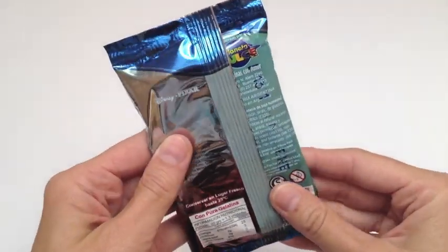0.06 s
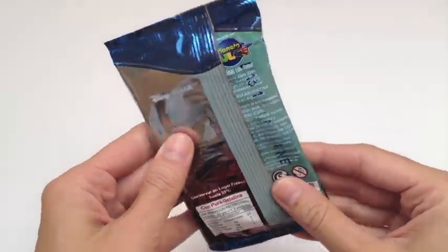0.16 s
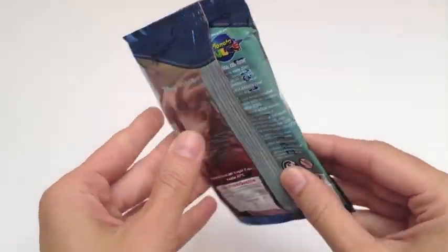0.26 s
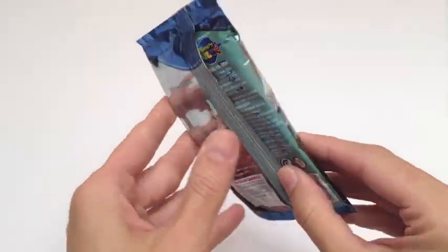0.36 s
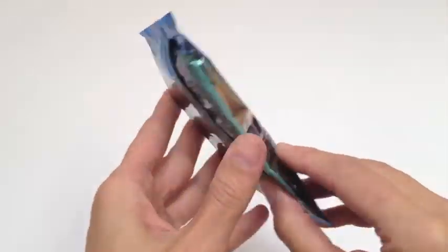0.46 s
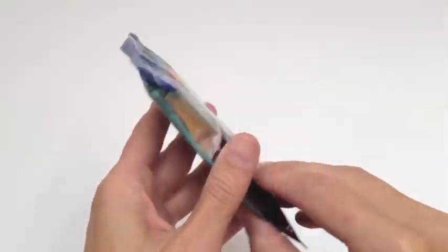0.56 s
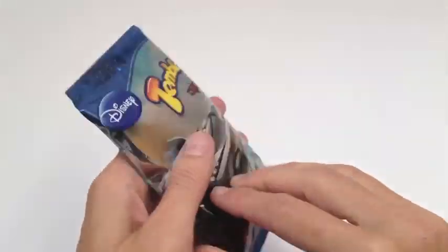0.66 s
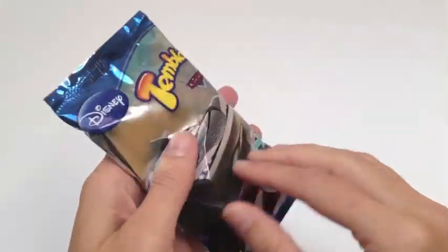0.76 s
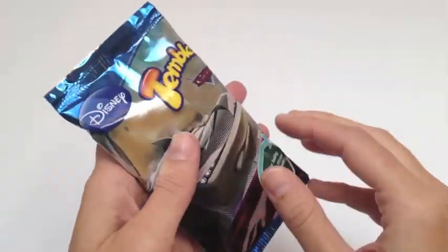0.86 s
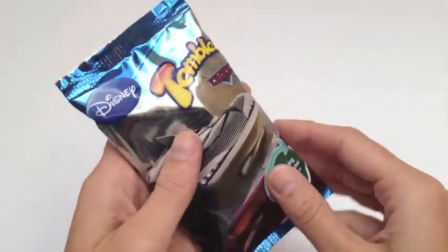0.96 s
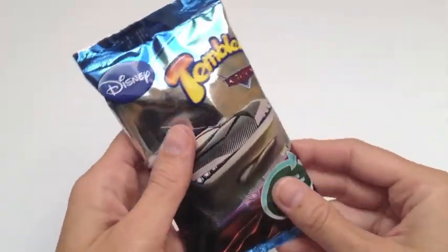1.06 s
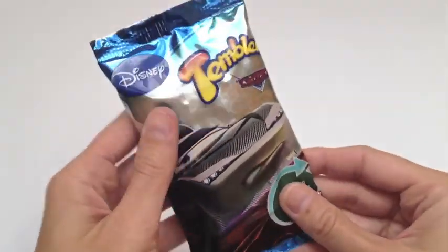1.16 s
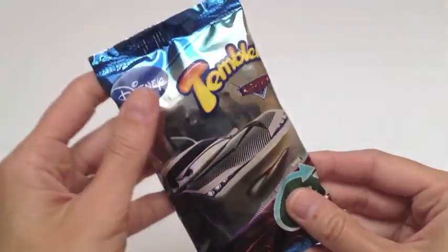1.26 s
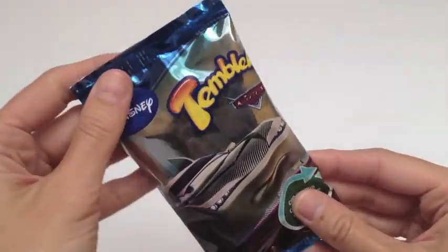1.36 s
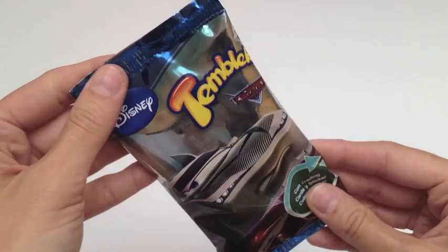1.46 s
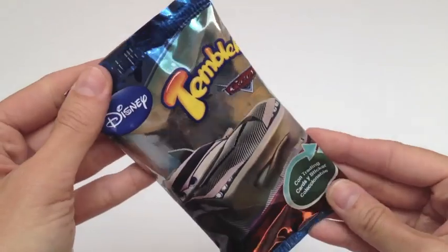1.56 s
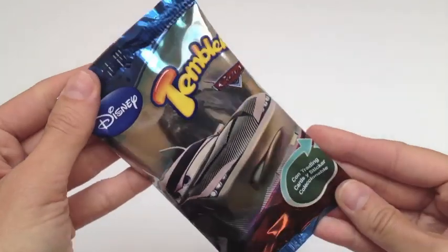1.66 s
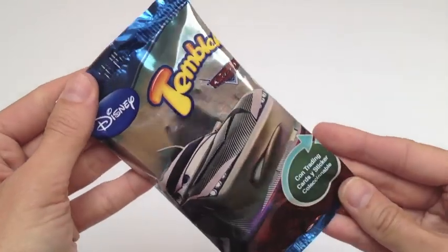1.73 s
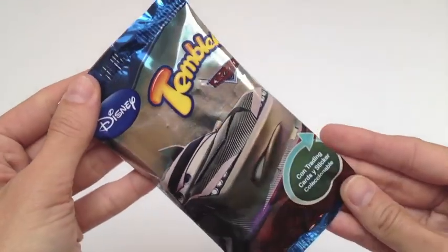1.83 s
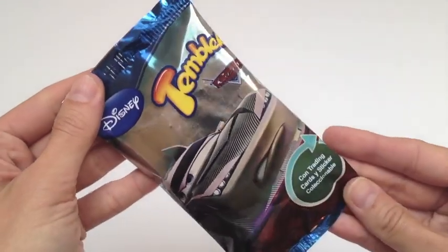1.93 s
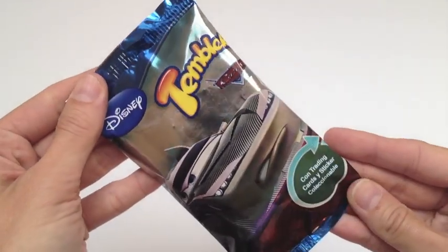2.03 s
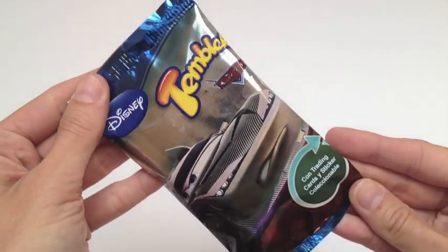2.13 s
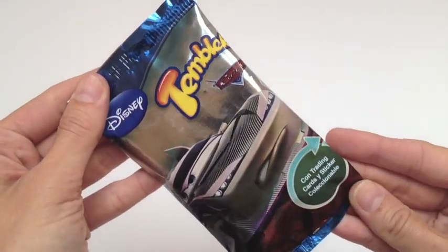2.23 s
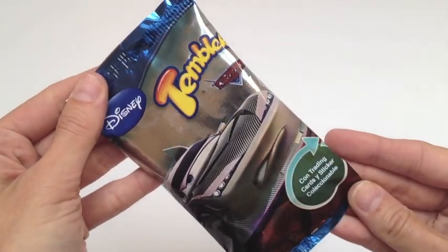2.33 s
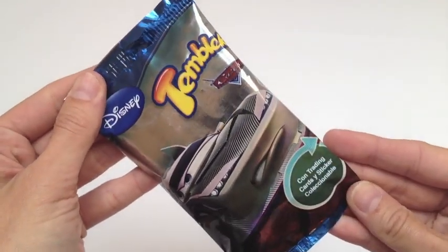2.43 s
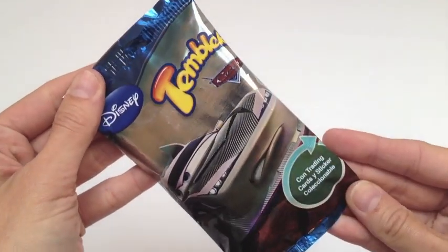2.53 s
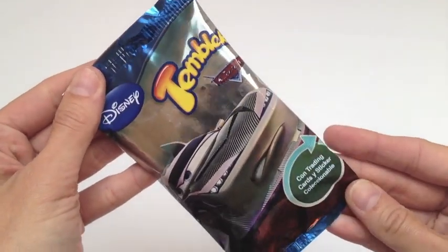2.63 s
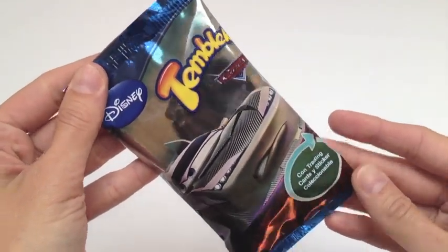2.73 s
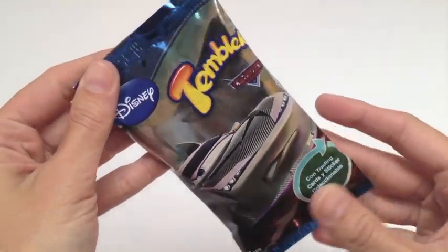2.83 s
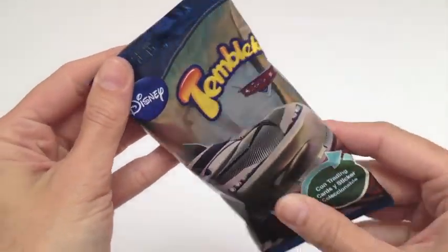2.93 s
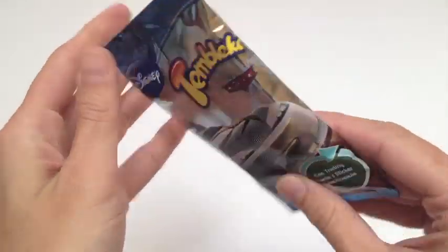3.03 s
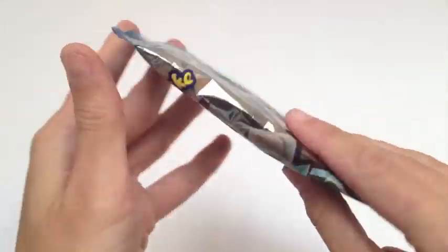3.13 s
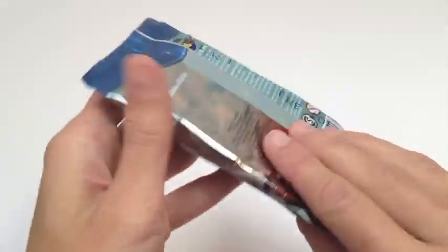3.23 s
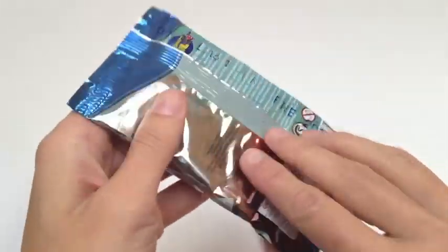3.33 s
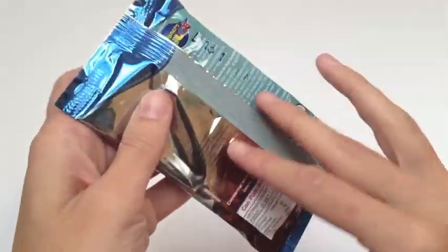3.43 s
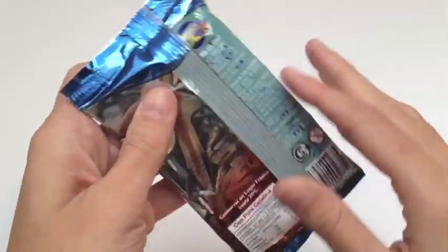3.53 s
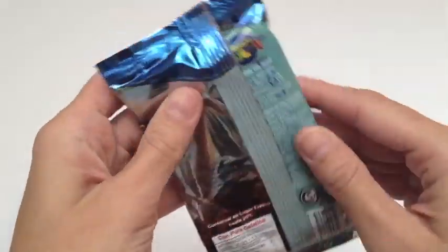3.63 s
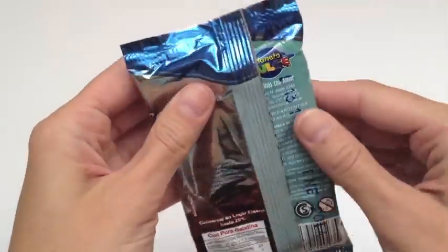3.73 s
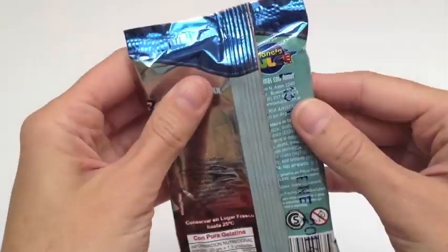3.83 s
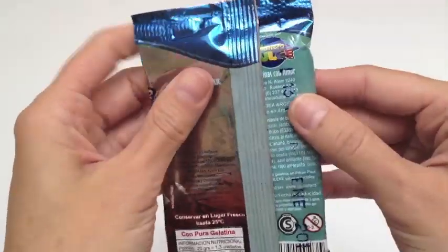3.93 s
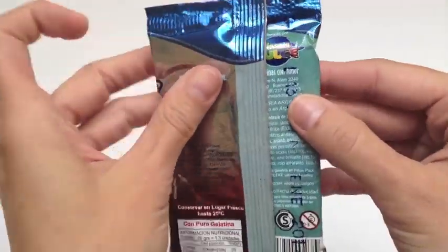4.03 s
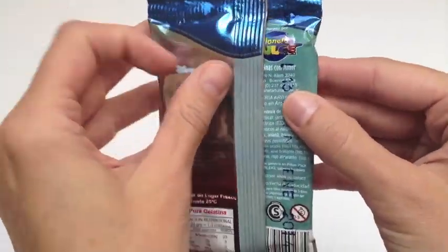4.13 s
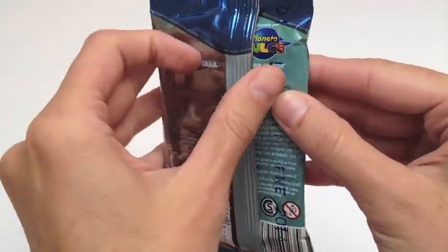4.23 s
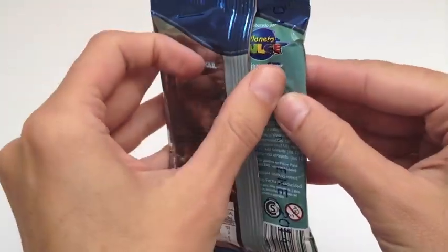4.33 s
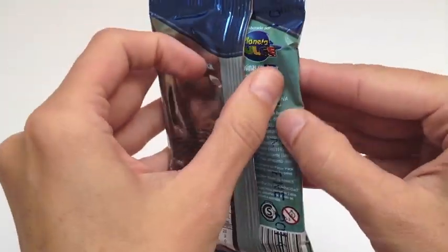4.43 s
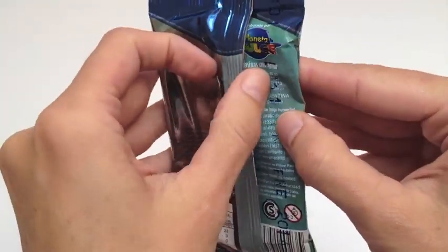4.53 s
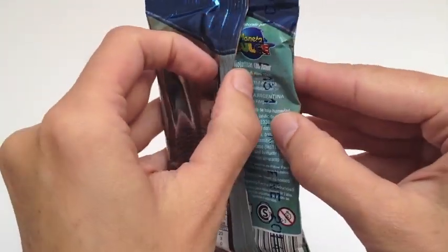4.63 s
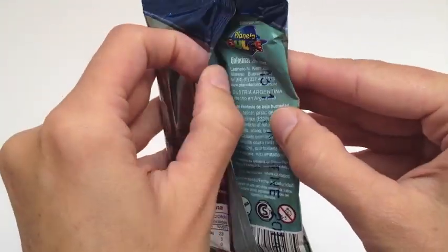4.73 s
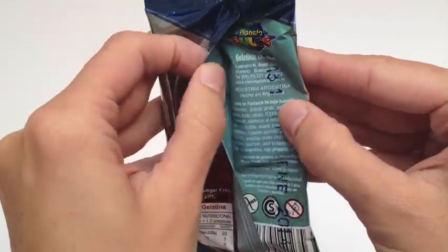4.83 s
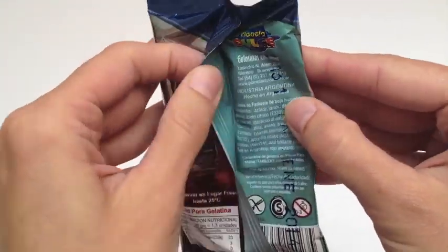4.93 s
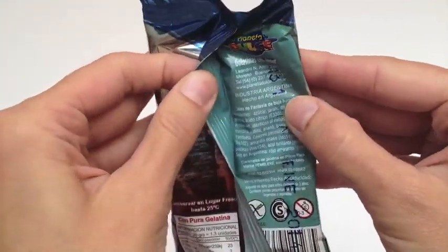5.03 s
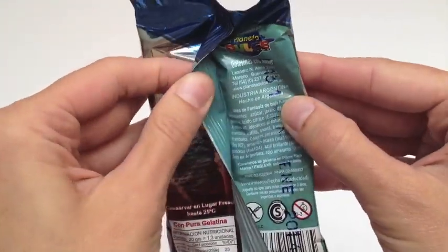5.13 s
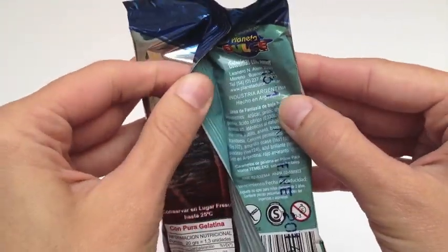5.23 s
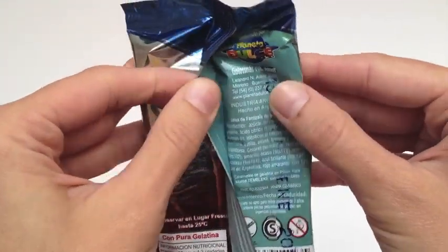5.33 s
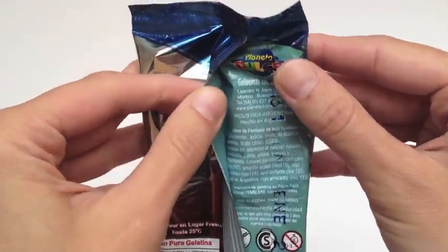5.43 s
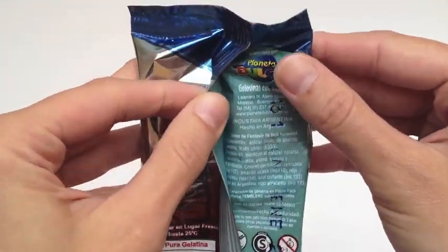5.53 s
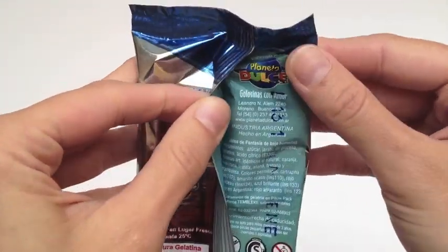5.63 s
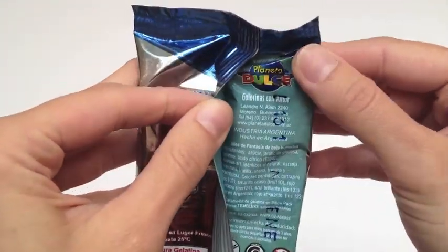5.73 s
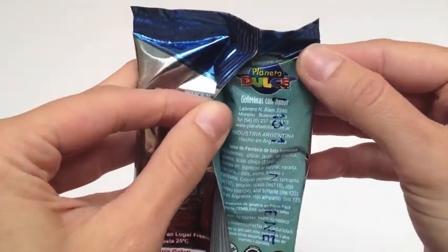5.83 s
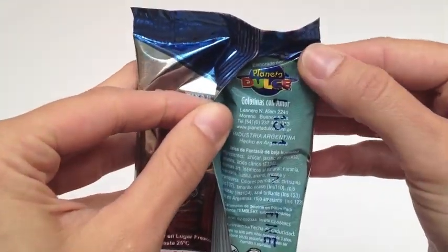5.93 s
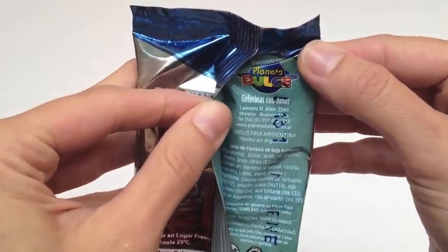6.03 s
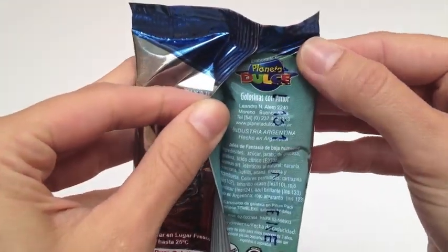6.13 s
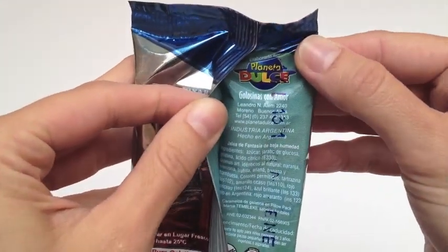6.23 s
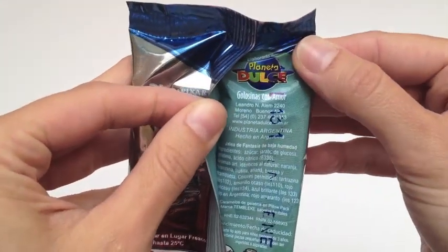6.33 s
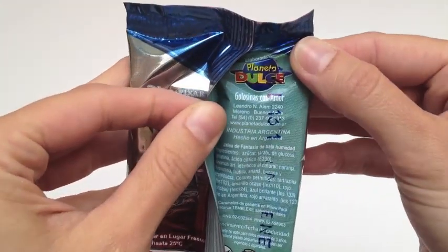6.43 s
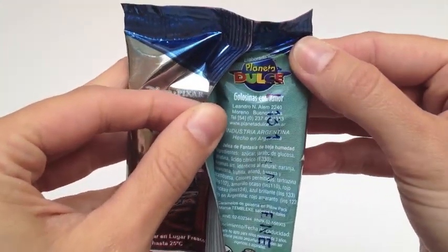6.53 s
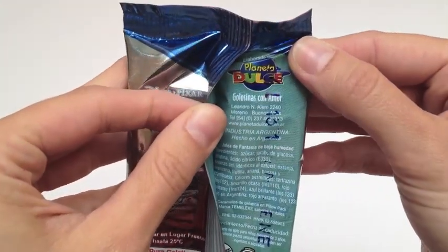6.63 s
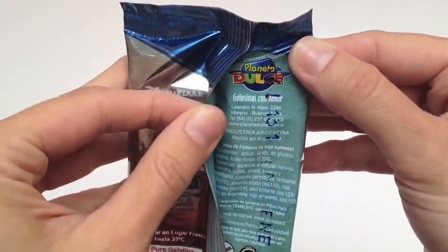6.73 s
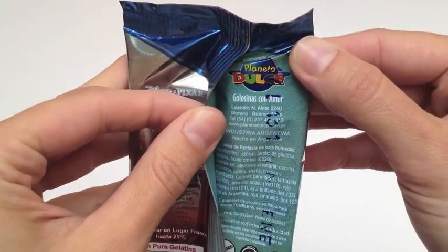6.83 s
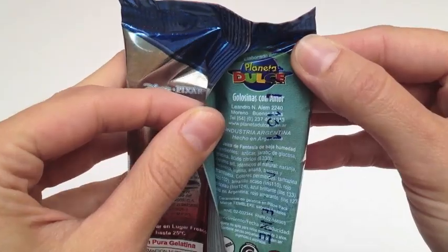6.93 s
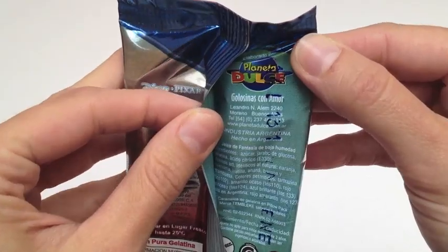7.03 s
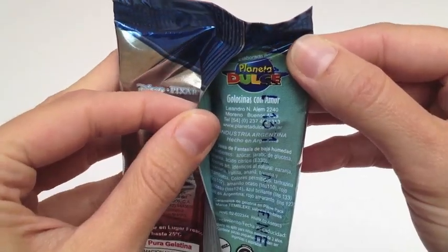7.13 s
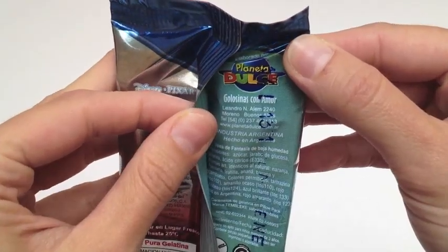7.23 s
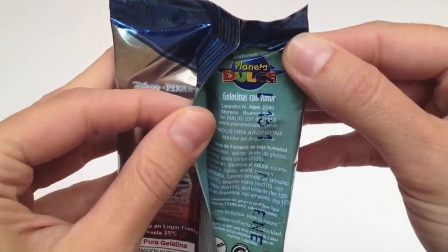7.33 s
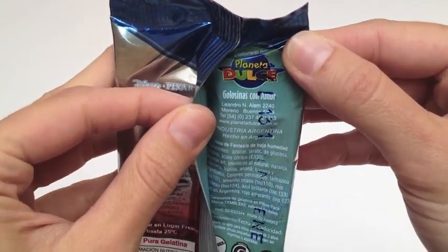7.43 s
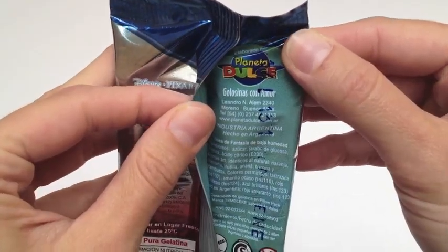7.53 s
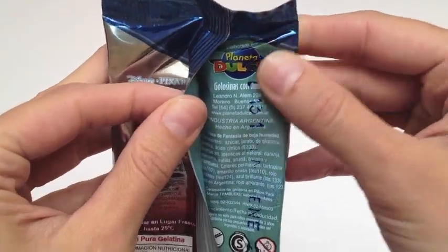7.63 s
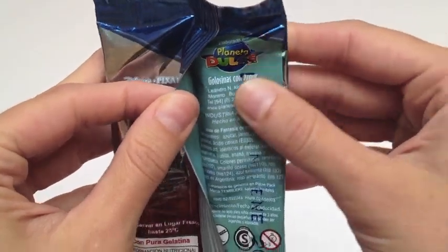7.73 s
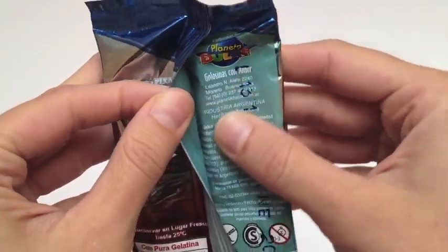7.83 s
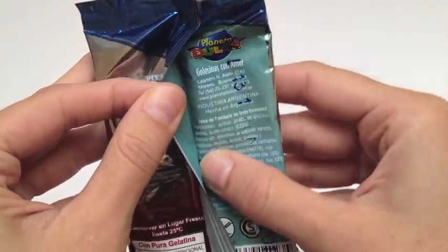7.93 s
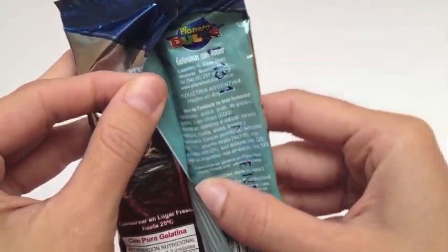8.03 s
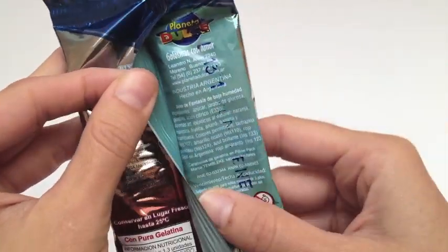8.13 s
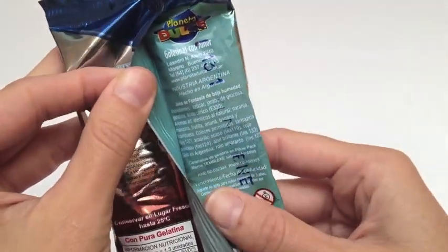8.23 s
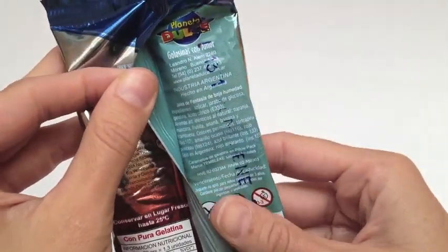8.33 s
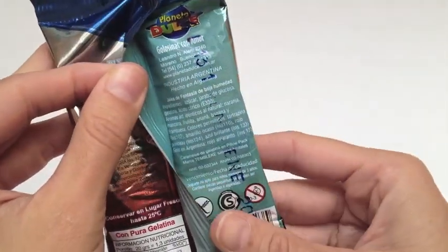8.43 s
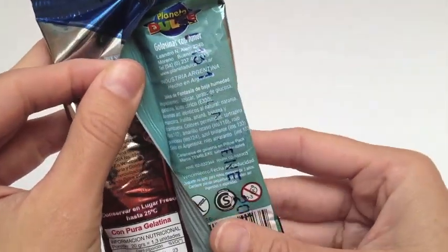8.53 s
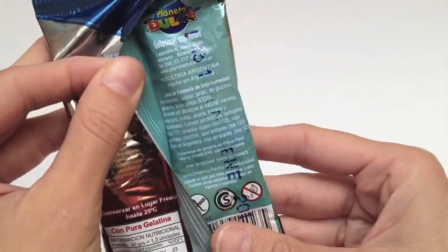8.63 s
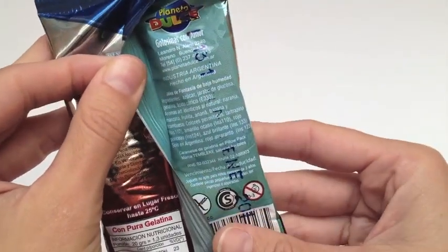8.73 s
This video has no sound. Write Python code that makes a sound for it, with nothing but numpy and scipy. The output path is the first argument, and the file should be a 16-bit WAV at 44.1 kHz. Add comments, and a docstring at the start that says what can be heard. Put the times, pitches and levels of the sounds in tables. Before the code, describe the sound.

Stiff foil snack packet crinkles and snaps close by as hands turn it over, pinch and pull its seam, with quiet pauses between bursts.

```python
"""Stiff metallised film buckles in single snaps and runs of finer crinkles as two hands turn a snack packet
over, pinch its back seam and pull at it, close by in a bare room. Each snap is a sudden flip ringing filters
for the facet, the pouch and the crease. Swarms of tiny rung clicks make the crinkle, uneven noise the sliding
fingers, low pulses the finger bumps. Echoes and a soft noise tail make the room, over air, whine and hum."""
import sys
import numpy as np
from scipy import signal
from scipy.fft import rfft, irfft, next_fast_len
from scipy.io import wavfile

SR = 44100
rng = np.random.default_rng(int(sys.argv[2]) if len(sys.argv) > 2 else 0)


def dump_mix(stems):
    """Bounce the given channels to the path in sys.argv[1] as a 16-bit WAV at rate SR."""
    frames = np.atleast_2d(stems).T  # one column per channel
    limited = np.clip(frames, -1, 1)  # hard clip at full scale
    pcm = np.round(limited * 32767).astype(np.int16)
    wavfile.write(sys.argv[1], SR, pcm)


N = 386757   # length in samples
CUTOFF_HZ = 15700   # top of the sound
SNAP_SAMPLES = 768   # length of one snap
SNAP_LEVEL_S = .005   # time over which a snap's energy is spread to state its level
LEAD_S = .004   # part of a snap that comes before the flip


def from_db(db):
    """Decibels to gain."""
    return np.exp(np.asarray(db) * np.log(10) / 20)


def at_hz(points, hz):
    """Read a (Hz, value) table on a log-frequency axis."""
    f, value = np.transpose(points)
    return np.interp(np.log(np.maximum(hz, 1)), np.log(f), value)


def coloured(x, spectrum):
    """Give noise a spectrum; rms 1."""
    size = next_fast_len(len(x))
    gain = from_db(at_hz(spectrum, np.fft.rfftfreq(size, 1 / SR)))
    y = irfft(rfft(x, size) * gain, size)[:len(x)]
    return y / np.std(y)


def noise(spectrum):
    """Steady noise of a given spectrum; rms 1."""
    return coloured(rng.standard_normal(N), spectrum)


def resonance(x, hz, q):
    """A damped resonance with gain 1 on top."""
    w = 2 * np.pi * min(hz, .45 * SR) / SR
    a = np.sin(w) / (2 * q)
    return signal.lfilter([a, 0, -a], [1 + a, -2 * np.cos(w), 1 - a], x)


def lowpass(x, hz):
    """Two-pole low-pass."""
    w = 2 * np.pi * min(hz, .45 * SR) / SR
    a, c = np.sin(w) / np.sqrt(2), np.cos(w)
    return signal.lfilter(np.array([1, 2, 1]) * (1 - c) / 2, [1 + a, -2 * c, 1 - a], x)


def at_level(x, db):
    """Scale a short sound so that its energy, spread over SNAP_LEVEL_S, has this level."""
    return x * from_db(db) * np.sqrt(SNAP_LEVEL_S * SR / np.sum(x ** 2))


def add(track, s, sound):
    """Mix a short sound into a track at time s."""
    i = int(np.clip(round(s * SR), 0, N - 1))
    track[i:i + len(sound)] += sound[:N - i]


def jolt(flutter, decay_s, creep, creep_s):
    """A facet creeps towards its limit, flips at once, then flutters for a moment."""
    t = (np.arange(SNAP_SAMPLES) - round(LEAD_S * SR)) / SR
    before = creep * np.exp(-np.abs(t) / creep_s)
    after = flutter * np.exp(-np.abs(t) / decay_s)
    shiver = np.where(t < 0, before, after)
    return (t == 0) + shiver * rng.standard_normal(SNAP_SAMPLES)


def snap(hz, facet_db, thump_db, crack_db, ragged):
    """One buckle: the facet rings, the whole pouch thumps, the crease itself cracks."""
    own = np.exp(ragged * rng.standard_normal(4).clip(-1.5, 1.5))   # no two facets are alike
    # a slack buckle (0) is a round pop, a taut one (1) a wide, bright click
    taut = np.clip((crack_db - facet_db + 22.5) / 21, 0, 1)

    flip = jolt(flutter=0.11 * ragged, decay_s=0.0027, creep=0.1 * ragged, creep_s=0.00076)
    body = resonance(flip, hz, q=1.15 - 0.88 * taut)
    ring = resonance(flip, hz * own[3] ** 0.12, q=24.0)   # it rings on briefly near its own pitch
    panel = resonance(flip, 930 * own[0] ** 0.25, q=3.1)   # the wider panel around it
    seam = resonance(flip, 3700 * own[1] ** 0.021, q=4.0)   # the stiff seam
    facet = body + 0.27 * ring + 1.09 * panel + 0.45 * seam
    facet = lowpass(resonance(facet, 0.76 * hz, q=0.66), hz * (1.84 + 0.87 * taut))

    # a heavier thump moves more of the pouch and sounds lower
    pouch_hz = np.clip(470 * 2 ** (-(thump_db + 49) / 45), 395, 600) * own[2] ** 0.049
    thump = resonance(resonance(flip, pouch_hz, q=3.14), 0.59 * pouch_hz, q=0.58)

    split = jolt(flutter=0.46 * ragged, decay_s=0.0013, creep=0.2 * ragged, creep_s=0.00057)
    # the more the crack outweighs the facet, the more of it lies in the top octave
    sharpness = from_db(np.clip(0.18 * (crack_db - facet_db + 5.5), -9, 6))
    crack = resonance(resonance(split, 6910, q=3.8), 3070, q=0.69)
    fizz = resonance(resonance(split, 14520, q=2.3), 12440, q=2.5)
    crack = crack + 0.79 * sharpness * fizz

    sound = at_level(facet, facet_db - .2) + at_level(thump, thump_db - 1.5) + at_level(crack, crack_db - .2)
    return rng.choice([-1, 1]) * sound


def creases(snaps, ragged):
    """All snaps in a row; a higher ragged ripples and varies them, 0 leaves them smooth."""
    out = np.zeros(N)
    for s, hz, facet_db, thump_db, crack_db in snaps:
        add(out, s - LEAD_S, snap(hz, facet_db, thump_db, crack_db, ragged))
    return out


# The creases that stand out as single snaps. Each row: time of the flip in seconds, facet pitch in Hz, then
# facet ring, pouch thump and treble crack in dB, before the small trims in snap().
MAIN_SNAPS = [(0.117, 1680, -48, -45.5, -71), (0.1731, 2380, -30.5, -43, -41.5),
              (0.1791, 1820, -39.5, -57, -41.5), (0.197, 2470, -39, -47.5, -51.5),
              (0.4032, 1910, -40.5, -41.5, -47), (0.4454, 3050, -47.5, -69, -46),
              (0.5434, 2250, -37, -50.5, -53), (0.612, 2380, -49, -64, -49.5),
              (0.6495, 3100, -35.5, -60, -41.5), (0.6909, 2680, -35.5, -55, -40),
              (0.7037, 1920, -39.5, -57, -50), (0.76, 2700, -42.5, -66, -50), (0.7739, 1730, -38, -59, -58),
              (0.9104, 2860, -40, -79, -56), (0.9244, 1740, -30.5, -45.5, -35.5),
              (1.0804, 3750, -32, -52, -38), (1.0863, 1720, -35.5, -57, -37), (1.0968, 2880, -44, -51, -37),
              (1.1422, 2750, -27, -48.5, -34), (1.1717, 2520, -31, -41.5, -38),
              (1.3873, 1960, -43.5, -48, -52), (1.4426, 2343, -42, -49.5, -50.5),
              (1.534, 2360, -41, -54, -47), (1.5532, 2340, -44, -56, -45), (1.5795, 3520, -42, -64, -44),
              (1.6076, 3380, -40.5, -66, -48), (1.6321, 2000, -44.5, -49.5, -54),
              (1.7099, 2820, -32, -48, -36), (1.7626, 1980, -31, -47, -49.5),
              (2.2143, 1750, -61.5, -77, -86), (2.652, 1050, -62, -64, -77),
              (2.7318, 1940, -44, -52.5, -47), (2.7445, 2820, -31, -50.5, -58),
              (2.752, 2940, -33, -46.5, -38.5), (2.9234, 2730, -36, -66, -47),
              (2.94, 1500, -40.5, -46, -44), (3.0256, 3640, -36, -70, -37.5),
              (3.0598, 2920, -33, -51, -39.5), (3.1515, 2740, -39.5, -65, -48),
              (3.2146, 2500, -32.5, -44, -45), (3.271, 3180, -35, -59, -41.5),
              (3.3663, 2050, -33.5, -45, -38.5), (3.4075, 2290, -38.5, -47, -40.5),
              (3.4835, 1110, -38, -48, -48.5), (3.5137, 1920, -34.5, -45, -36),
              (3.547, 2600, -44, -54, -42), (3.5619, 3400, -40, -45.5, -47), (3.579, 2550, -38, -66, -43),
              (3.5996, 1860, -32.5, -41.5, -40), (3.6428, 2100, -34.5, -63, -42),
              (3.683, 2650, -38, -56, -40), (3.7018, 2850, -40, -66, -43.5),
              (3.7649, 4000, -34.5, -60, -37.5), (3.775, 2150, -36, -52, -42),
              (3.8933, 3300, -45, -63, -47.5), (3.9481, 3200, -36, -46.5, -38),
              (3.9864, 2540, -33.5, -44, -38), (4.066, 2270, -35, -65, -38),
              (4.0724, 2100, -37.5, -58, -43.5), (4.1616, 2920, -30.5, -38, -40),
              (4.2587, 3060, -45, -67, -47.5), (4.3493, 2470, -45, -63, -43),
              (4.388, 1960, -43, -57, -47.5), (4.5146, 2070, -43, -59, -54), (4.5422, 2560, -42, -57, -55),
              (4.6399, 2300, -39, -58, -44), (4.677, 2520, -41.5, -78, -59),
              (4.7082, 2120, -32.5, -44, -41), (4.7292, 2120, -28, -34, -28), (4.906, 3400, -48, -54, -44),
              (4.9679, 3460, -36, -69, -45), (5.003, 2320, -40.5, -51, -45),
              (5.0238, 3330, -40.5, -62, -46.5), (5.037, 1710, -36.5, -49, -46.5),
              (5.078, 2500, -37, -56, -46.5), (5.1367, 2650, -44.5, -56, -64),
              (5.154, 2000, -45, -52.5, -55), (5.2558, 1800, -37.5, -84, -62),
              (5.3115, 3460, -40, -51, -48), (5.3699, 2920, -44.5, -66, -51), (5.388, 2020, -47, -60, -53),
              (5.4214, 1240, -45, -52, -61), (5.459, 2020, -47, -64, -70), (5.556, 2810, -49.5, -66, -56),
              (5.588, 1650, -42, -50, -56), (5.626, 3300, -31, -38, -39), (5.6407, 3200, -35.5, -54, -41.5),
              (5.7023, 1770, -38.5, -50, -45), (6.0929, 1900, -40.5, -56, -41),
              (6.1206, 1800, -40, -47.5, -45), (6.1675, 2150, -47, -72, -60),
              (6.2275, 3040, -33, -40.5, -35), (6.257, 1420, -39.5, -46, -52),
              (6.3664, 2960, -31, -59, -40.5), (6.6144, 1680, -39, -48.5, -64),
              (6.8744, 1350, -43, -68, -64), (6.9359, 2340, -50.5, -55, -61),
              (7.0844, 3000, -34.5, -58, -44.5), (7.21, 3080, -75, -96, -56),
              (7.297, 2960, -31.5, -46, -37), (7.6649, 2680, -42.5, -55, -46),
              (7.7182, 2100, -42.5, -50, -46.5), (7.823, 3180, -34.5, -43.5, -37.5),
              (7.8346, 2200, -35.5, -55, -48), (7.956, 3370, -40.5, -52, -46.5),
              (7.999, 2380, -36.5, -58, -47), (8.0244, 3600, -36.5, -66, -36),
              (8.0594, 2530, -29.5, -40.5, -36), (8.077, 1980, -38.5, -49, -41),
              (8.11, 3970, -41.5, -59, -52), (8.1441, 2890, -37, -47, -39.5), (8.1607, 3600, -35, -46, -56),
              (8.1895, 3680, -45, -70, -47), (8.201, 2000, -41, -44, -50),
              (8.2349, 2770, -30, -42.5, -36.5), (8.2569, 2490, -41, -51, -49),
              (8.3194, 1820, -35.5, -49, -42), (8.3778, 2370, -38.5, -45, -44),
              (8.3971, 2360, -38, -45.5, -38.5), (8.4523, 2950, -44, -52, -50),
              (8.512, 2240, -41, -49, -48), (8.6269, 3180, -40.5, -69, -46.5)]


def neighbour_snaps():
    """A snap upsets the creases next to it: a weak one just before, a stronger one just after; snap rows."""
    lead_s, before_db = .005, -14
    lag_s, after_db = .011, -12
    spread_oct = 0.45
    slack_below_db, slack_share = -58, 0.43   # in film worked less than this, neighbours fade by a share
    rows = []
    for s, hz, *levels in MAIN_SNAPS:
        slack_db = slack_share * min(effort_db(s) - slack_below_db, 0)
        for gap, db in (-lead_s, before_db), (lag_s, after_db):
            pitch = hz * 2 ** (spread_oct * rng.standard_normal())
            rows.append((s + gap * rng.uniform(.3, 1.5), pitch, *np.add(levels, db + slack_db)))
    return rows


def lesser_snaps():
    """Small creases give way at uneven gaps, louder the harder the film is worked; snap rows."""
    per_s = 30
    centre_hz, spread_oct = 2100, 0.47
    above_db, spread_db = 5.5, 3.5   # facet over the effort, and its scatter
    thump_db, crack_db, colour_db = -15.5, -16, 8.5   # against the facet, and the scatter of both
    count = int(per_s * N / SR)
    s = (np.arange(count) + rng.random(count)) / per_s
    pitch, size, thump, crack = rng.standard_normal((count, 4)).clip(-2, 1.5).T
    hz = centre_hz * 2 ** (spread_oct * pitch)
    facet = effort_db(s) + above_db + spread_db * size
    return np.transpose([s, hz, facet,
                         facet + thump_db + colour_db * thump,
                         facet + crack_db + colour_db * crack])


# The fingers take hold and work the film: the packet is turned to its front, turned back, its seam pinched and
# pulled, then one hand shifts down it. Each row: start in seconds, hold in seconds, effort in dB.
HAND_GRIPS = [(0.12, 0.32, -60.5), (0.629, 0.15, -48.5), (1.02, 0.72, -56.5), (2.95, 0.042, -48.5),
              (3.34, 0.056, -46), (3.52, 0.52, -54.5), (4.15, 0.35, -62.5), (4.699, 0.23, -54),
              (5.3, 0.11, -63.5), (5.67, 0.039, -54.5), (7.68, 0.084, -56), (7.94, 0.26, -55),
              (8.36, 0.16, -57)]


def effort_db(s):
    """How hard the film is worked at times s: every grip swells, holds and lets go."""
    rise_db_per_s, fall_db_per_s = 142, 132
    rest_db = -96   # while the hands keep still
    grips = []
    for start, held, db in HAND_GRIPS:
        swell = rise_db_per_s * np.maximum(start - s, 0)
        release = fall_db_per_s * np.maximum(s - start - held, 0)
        grips.append(db - swell - release)
    return np.maximum(np.max(grips, axis=0), rest_db)


# The colour of skin sliding on film, also lent to the crinkles. Each row: frequency in Hz, relative level in
# dB per Hz.
FILM_COLOUR = [(70, -32), (130, -6.5), (250, 2), (420, 0), (620, -7.5), (900, 1), (2000, -5.5), (4000, -6),
               (7000, -14.5), (9700, -20.5), (13000, -12), (16000, -11.5)]


def crinkles(work, per_s, spread_db, count=18):
    """Swarms of tiny creases give way at random, each ringing briefly at one of a row of pitches."""
    out = np.zeros(N)
    for hz in np.geomspace(380, 8000, count):
        at = rng.integers(0, N, round(per_s * N / SR / count))
        size = from_db(spread_db * rng.standard_normal(len(at)).clip(-2, 1.5))
        clicks = np.zeros(N)
        clicks[at] = size * rng.choice([-1, 1], len(at))
        out += resonance(resonance(clicks + 1e-18, hz, q=5.1), hz, q=0.16)
    return work * coloured(out, FILM_COLOUR)


def rubbing(work, slip_hz, grip_db):
    """Skin sticks and slips on the film, so the hiss comes in uneven spurts."""
    slips = lowpass(rng.standard_normal(N), slip_hz)
    return work * from_db(grip_db * slips / np.std(slips)) * noise(FILM_COLOUR)


# Soft finger bumps on the pouch. Each row: start in seconds, peak in dB before the common level_db is added.
FINGER_BUMPS = [(0.398, -48), (3.396, -44), (4.157, -40), (4.448, -33.5), (4.726, -47), (5.621, -62),
                (6.254, -34.5)]


def bumps(hz, level_db):
    """A fingertip meets the pouch: a soft push into the air inside."""
    out, t = np.zeros(N), np.arange(2048) / SR
    push = resonance(resonance(1.0 * (t == 0), hz, q=1.8), hz, q=1.2)
    push = push / np.abs(push).max()
    for s, db in FINGER_BUMPS:
        add(out, s, from_db(db + level_db) * push)
    return out


# The colour of the room's tail. Each row: frequency in Hz, relative level in dB.
TAIL_COLOUR = [(100, -7), (280, -1.5), (430, -3), (600, -2.5), (900, -4), (1700, -1), (3000, -2.5),
               (5500, 3), (10000, -0.5), (14000, 1)]
# How long the room rings. Each row: frequency in Hz, time to die by 60 dB in seconds.
TAIL_T60 = [(150, 1), (450, 0.81), (1000, 1), (2800, 0.99), (7000, 0.88), (14000, 0.44)]


def echo(near_db, near_s, tail_db):
    """The room from one spot: quick scatter off hands and table, then a diffuse tail that dies band by band."""
    t = np.arange(SR) / SR
    f = np.fft.rfftfreq(SR, 1 / SR)
    wash = rfft(coloured(rng.standard_normal(SR), TAIL_COLOUR))
    edges = np.linspace(np.sqrt(60), np.sqrt(CUTOFF_HZ), 13) ** 2
    tail = np.zeros(SR)
    for lo, hi in zip(edges, edges[1:]):
        band = irfft(wash * (f >= lo) * (f < hi), SR)
        t60 = at_hz(TAIL_T60, np.sqrt(lo * hi))
        tail += band * np.exp(-np.log(1000) * t / t60)
    tail = tail * np.clip((t - .004) / 0.0051, 0, 1)   # the tail fades in after the first scatter
    near = rng.standard_normal(SR) * np.exp(-t / near_s) * (t > .0028)
    return from_db(near_db) * near / np.linalg.norm(near) + from_db(tail_db) * tail / np.linalg.norm(tail)


def room(x, near_db, near_s, tail_db, count):
    """The packet keeps moving and turning, so each stretch of sound meets another pattern of echoes."""
    out = np.zeros(N)
    for at in np.array_split(np.arange(N), count):
        add(out, at[0] / SR, signal.fftconvolve(x[at], echo(near_db, near_s, tail_db)))
    return out


# Steady room air and microphone hiss. Each row: frequency in Hz, relative level in dB per Hz.
AIR_COLOUR = [(30, 3), (80, -12), (120, -4.5), (200, 0), (300, -5.5), (480, -4), (650, -7), (1400, -10.5),
              (3000, -13.5), (6000, -15.5), (9500, -22.5), (12000, -16), (15000, -13), (16000, -13.5)]


def air(level_db):
    """Steady noise of the room and the microphone."""
    return from_db(level_db) * noise(AIR_COLOUR)


def tone(hz, peak_db):
    """A steady sine, for the faint electronic whine and the faint hum in the room."""
    return from_db(peak_db) * np.sin(2 * np.pi * hz * np.arange(N) / SR)


def scene():
    """Snaps, crinkles, rubbing and bumps; the microphone gets one direction, the room all of them."""
    work = from_db(effort_db(np.arange(N) / SR))
    snaps = [*MAIN_SNAPS, *lesser_snaps(), *neighbour_snaps()]
    fine = from_db(-5.5) * crinkles(work, per_s=250, spread_db=7.5)
    rub = from_db(-7.5) * rubbing(work, slip_hz=70, grip_db=4.5)
    fingers = fine + rub + bumps(hz=248, level_db=-10.5)
    direct = creases(snaps, ragged=0.81) + fingers
    # all directions averaged sound smoother than one
    all_round = creases(snaps, ragged=.25) + fingers
    reflected = room(all_round, near_db=-10.5, near_s=0.0092, tail_db=-11.0, count=8)
    whine = tone(hz=11400, peak_db=-85)
    hum = tone(hz=121, peak_db=-85)   # before the bass cut
    return (direct + reflected + air(level_db=-68.5) + whine + hum)[None]


def record(dry):
    """The microphone drops the deep bass, and the top is cut."""
    thin = signal.sosfilt(signal.butter(2, 110, "high", fs=SR, output="sos"), dry)
    return signal.sosfilt(signal.ellip(10, .2, 70, CUTOFF_HZ, fs=SR, output="sos"), thin)


dry = scene()
out = record(dry)
dump_mix(out)
```